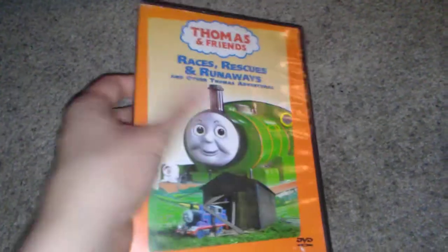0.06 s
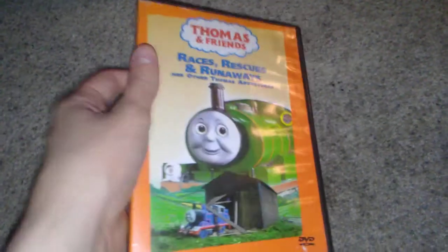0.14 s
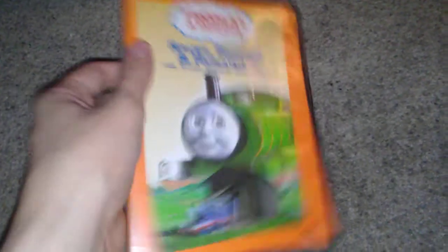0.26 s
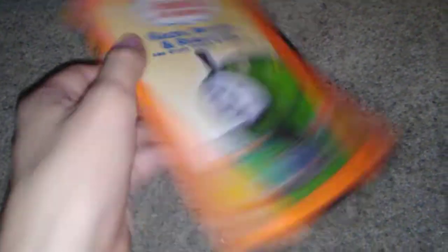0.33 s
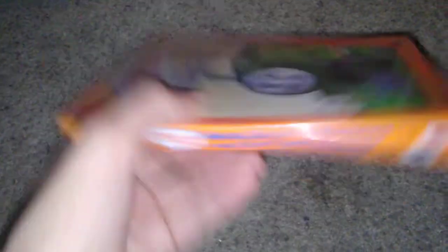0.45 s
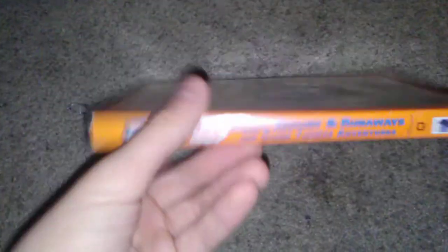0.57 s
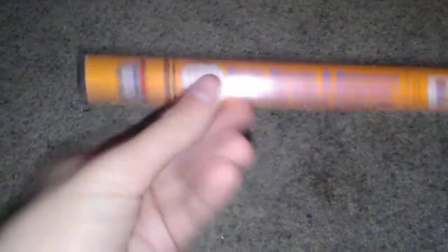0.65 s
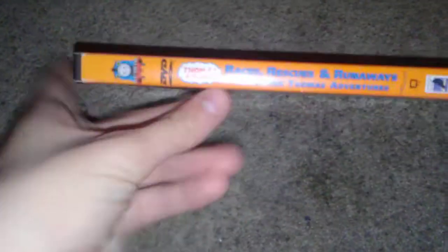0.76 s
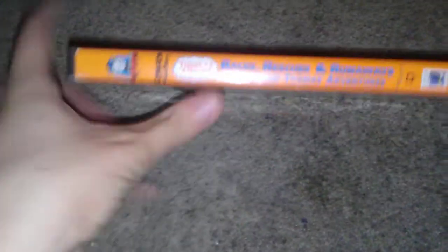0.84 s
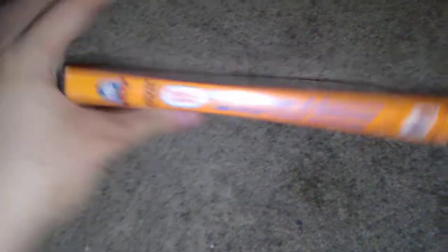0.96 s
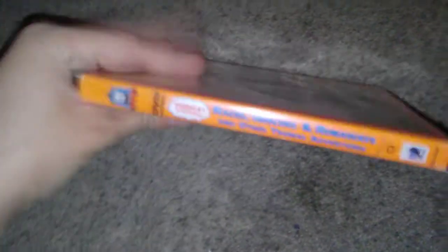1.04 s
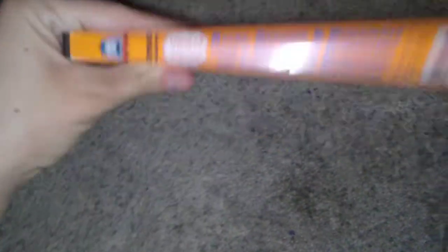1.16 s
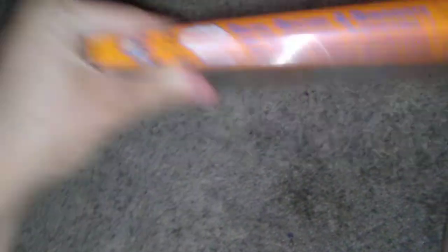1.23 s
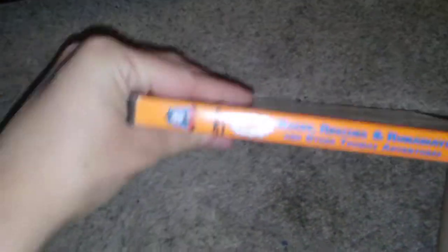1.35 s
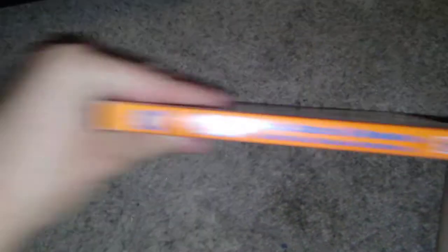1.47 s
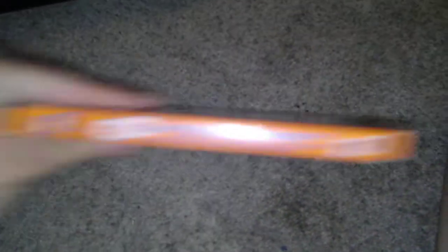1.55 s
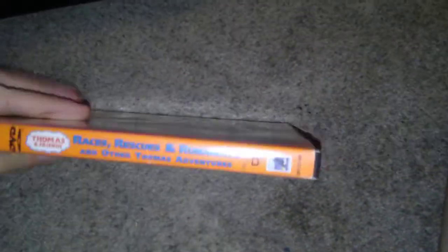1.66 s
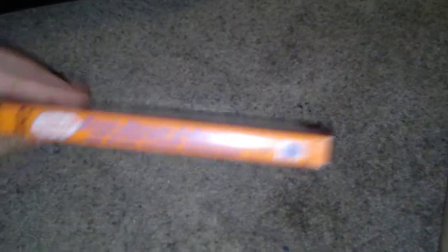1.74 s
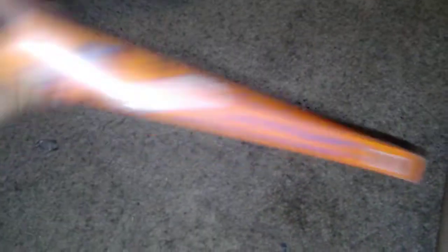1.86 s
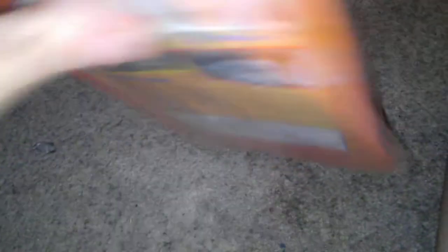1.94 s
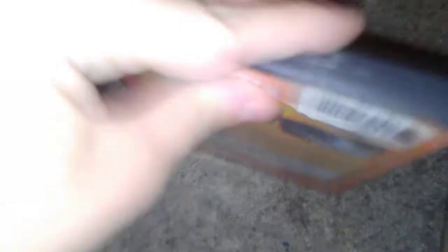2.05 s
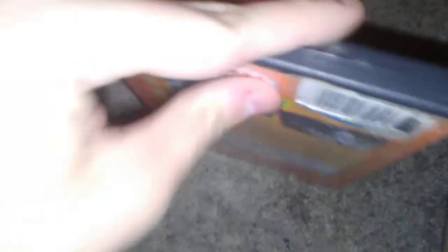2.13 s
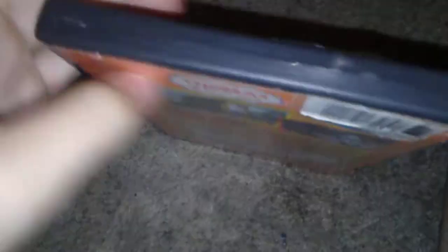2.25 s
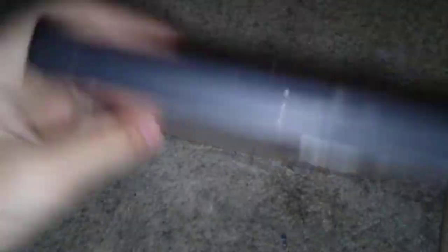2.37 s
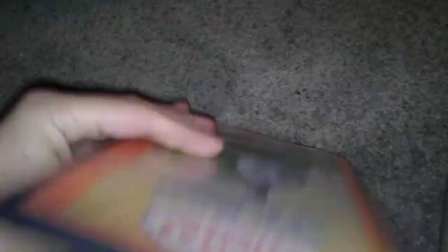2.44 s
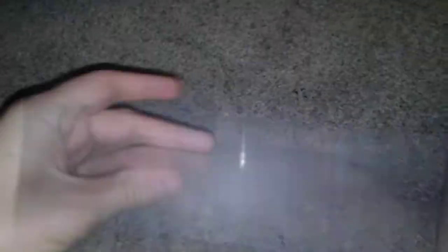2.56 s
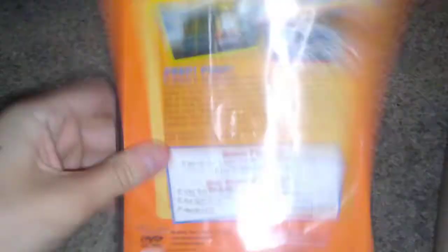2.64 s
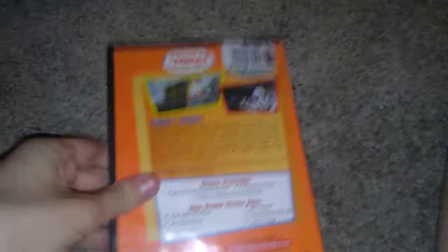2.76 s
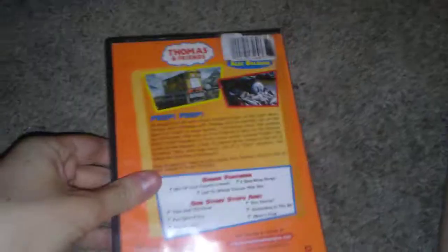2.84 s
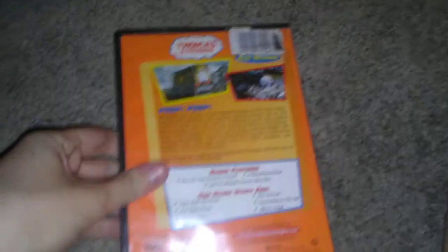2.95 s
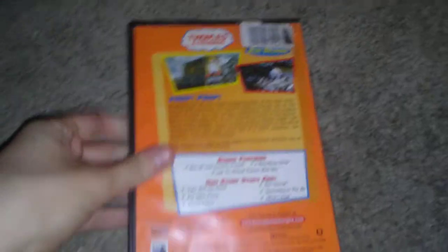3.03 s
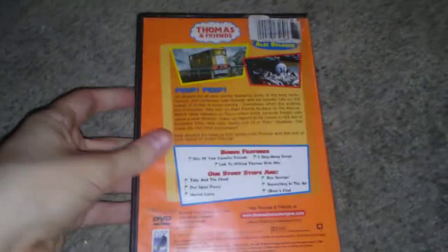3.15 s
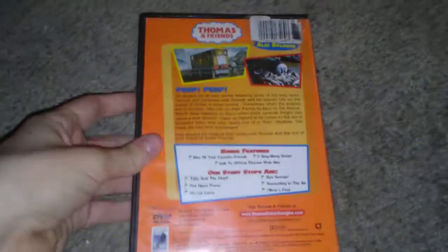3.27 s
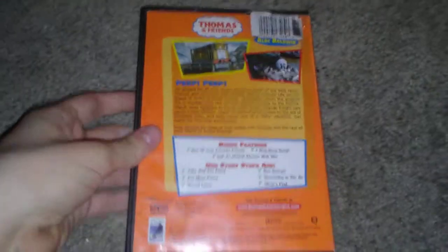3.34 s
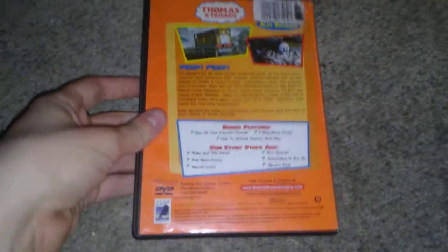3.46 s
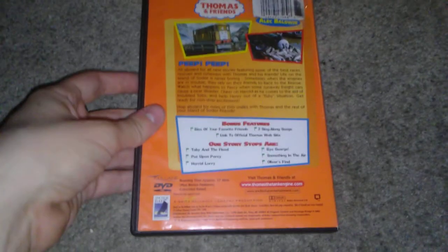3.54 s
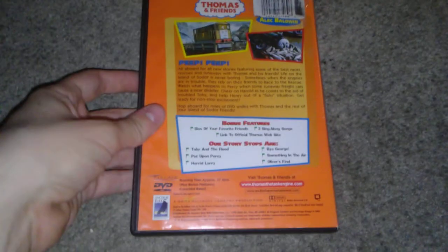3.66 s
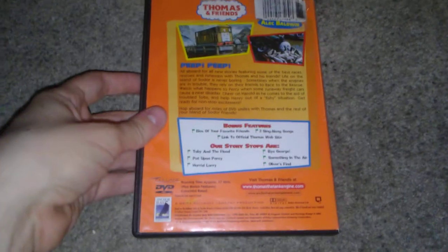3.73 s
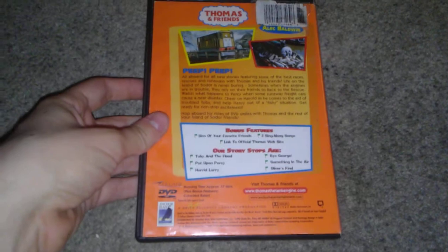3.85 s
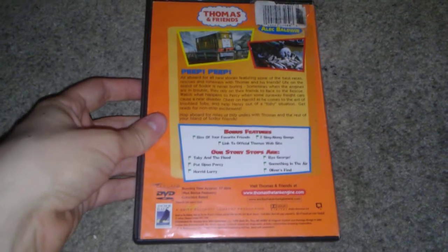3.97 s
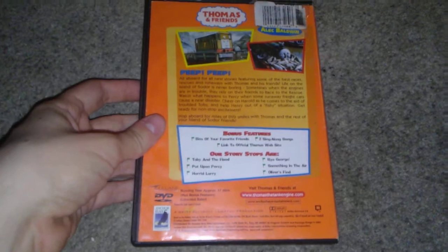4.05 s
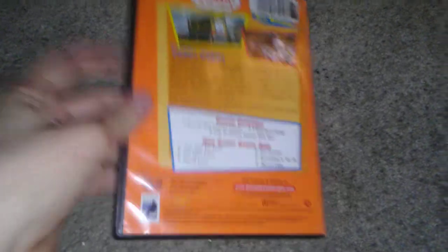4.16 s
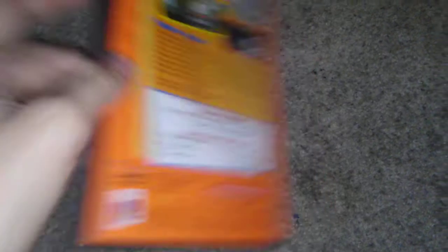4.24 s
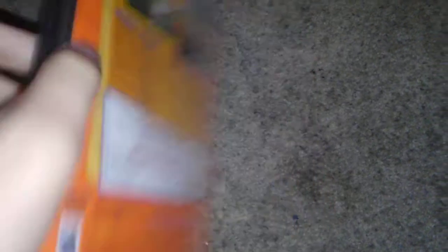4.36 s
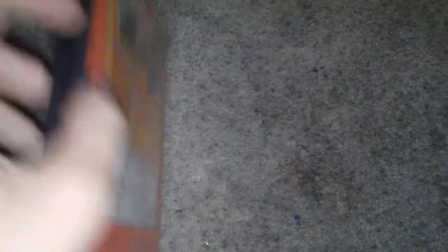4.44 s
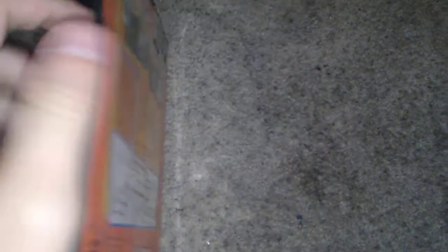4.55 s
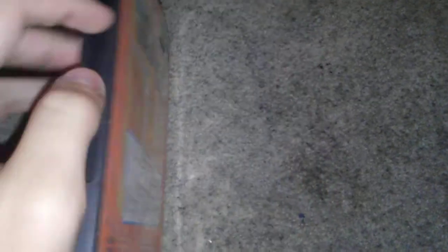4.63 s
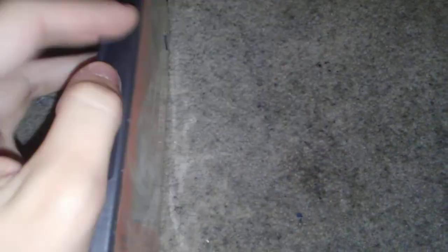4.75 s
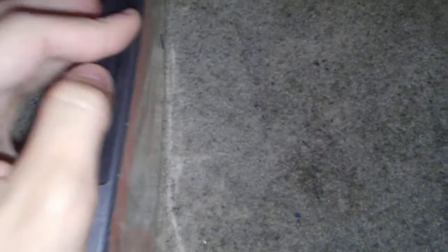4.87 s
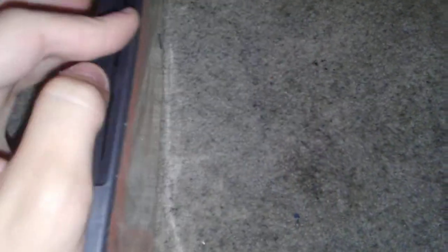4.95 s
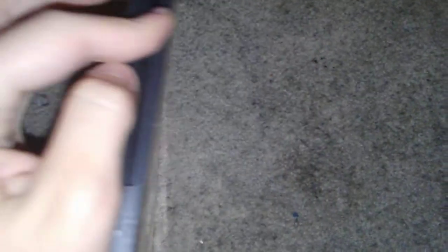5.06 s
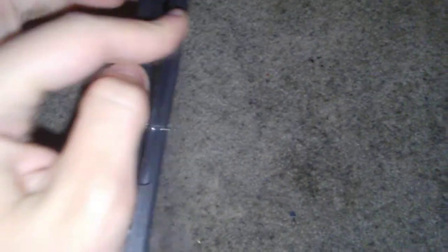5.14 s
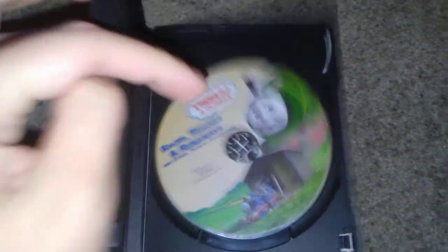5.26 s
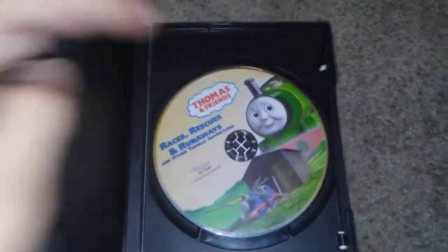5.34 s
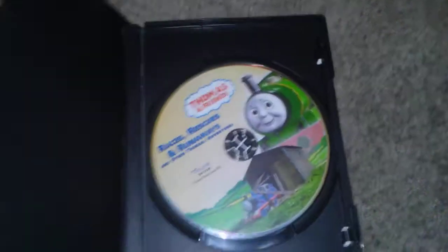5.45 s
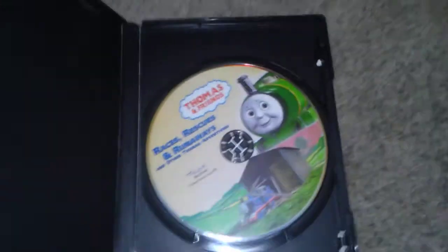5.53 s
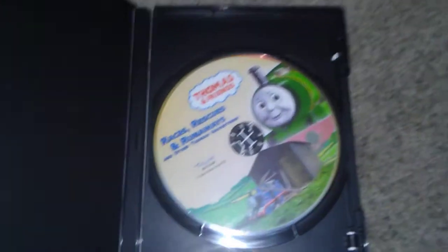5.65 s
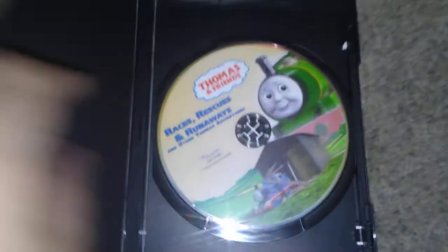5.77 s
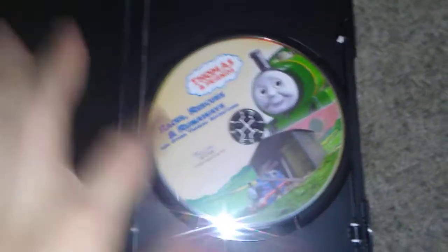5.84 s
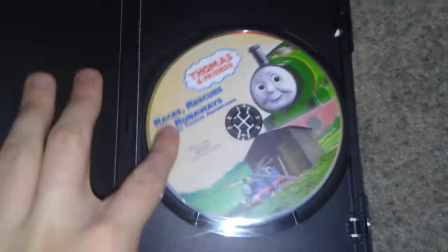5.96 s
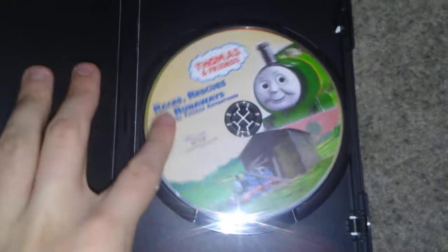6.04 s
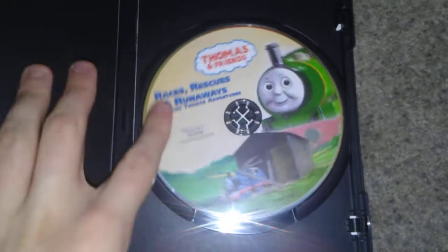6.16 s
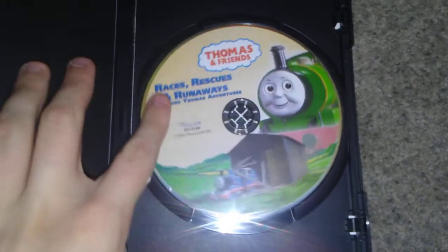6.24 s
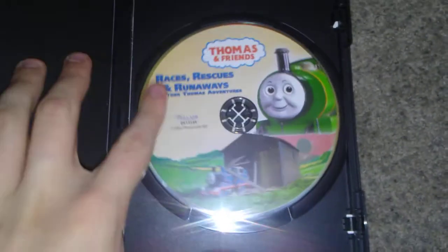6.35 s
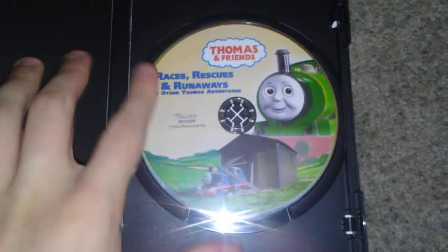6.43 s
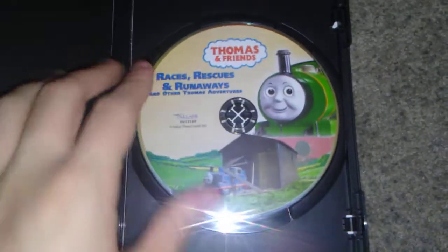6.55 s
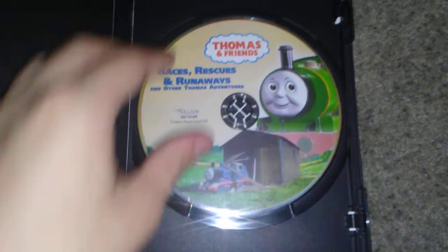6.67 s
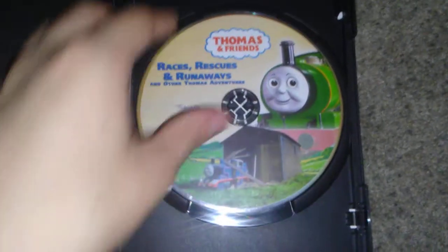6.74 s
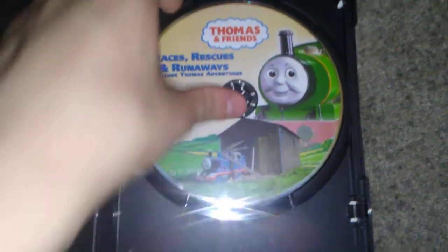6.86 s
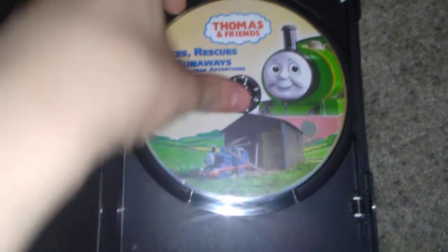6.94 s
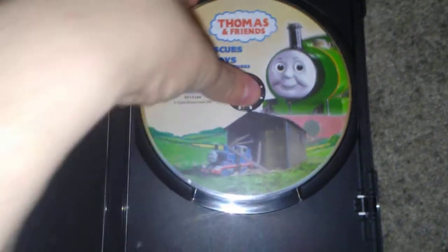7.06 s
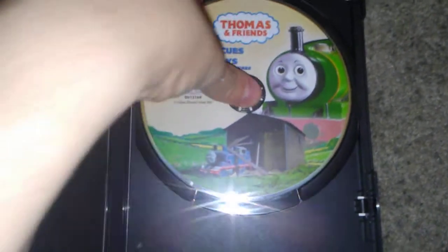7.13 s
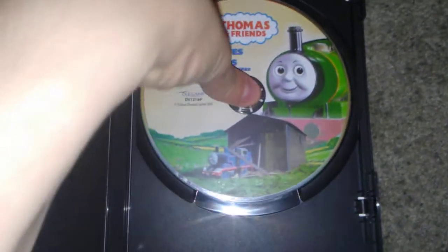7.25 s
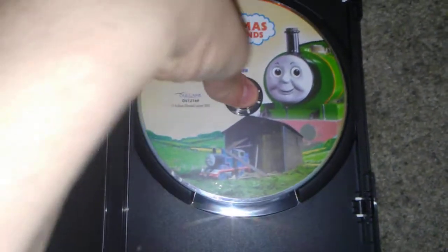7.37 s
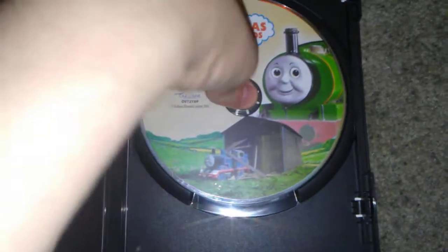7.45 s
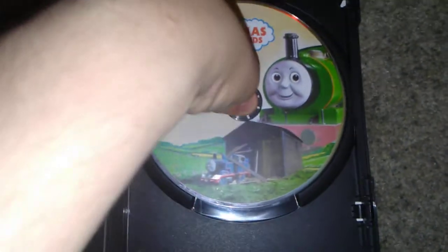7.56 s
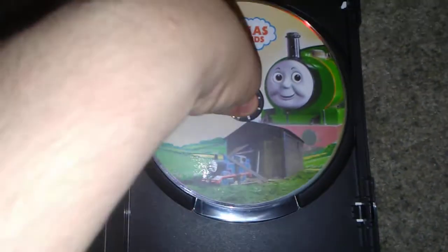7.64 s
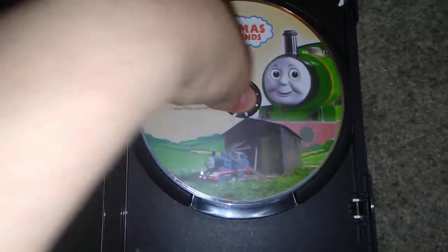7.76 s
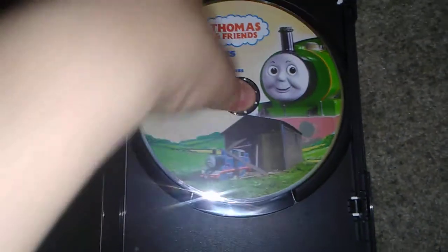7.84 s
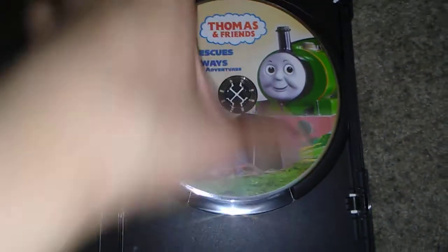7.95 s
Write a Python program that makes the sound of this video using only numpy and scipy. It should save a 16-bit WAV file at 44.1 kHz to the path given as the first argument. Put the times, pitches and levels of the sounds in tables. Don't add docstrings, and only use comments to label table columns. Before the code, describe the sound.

Close to a small microphone in a quiet, slightly reflective room, skin and carpet brush a thin plastic disc case. Light taps begin around 0.25 s, then a dense crunch of brittle snaps at 0.5-0.75 s, with a tiny hinge-like creak just after. Soft scraping sweeps follow near 1.1 and 1.6 s, with a sharp click at 1.38. From 2.0 to 2.7 s the case is turned with ticks, scuffs and grainy rubbing, then clacks loudly at 2.83 s. A smaller click at 3.19 precedes near silence: faint hum, thin whine and hiss. Fumbling ticks and crackles return at 4.2-4.75 s. At 5.21 s comes the loudest burst, hard cracking snaps and ringing thuds until 5.4, then small crackles to 6.0. Faint nail ticks at 6.4-7.5 s lead to a sharp, hollow ringing pop at 7.68 and a few clicks around 7.85-7.95.

```python
import sys
import numpy as np
from scipy import signal
from scipy.fft import rfft, irfft
from scipy.io import wavfile

SR = 44100
rng = np.random.default_rng(int(sys.argv[2]) if len(sys.argv) > 2 else 0)


def undo_db(level):
    steps = np.asarray(level, float) / 20
    return 10 ** steps


def unload_wav(signal):
    wavfile.write(
        sys.argv[1],
        SR,
        np.round(np.clip(np.atleast_2d(signal).T, -1, 1) * 32767).astype(np.int16),
    )


N = 352800


def rms_one(x):
    return x / np.sqrt(np.mean(x ** 2) + 1e-20)


def high_pass(x, hz):
    return signal.sosfilt(signal.butter(4, hz, "high", fs=SR, output="sos"), x)


def shaped(x, points):
    hz, level_db = np.transpose(points)
    grid_hz = np.maximum(np.arange(N // 2 + 1) * SR / N, 1)
    gain = undo_db(np.interp(np.log(grid_hz), np.log(hz), level_db))
    return rms_one(irfft(rfft(x) * gain, N))


def resonate(x, modes):
    out = 0
    for k, (hz, width_hz, level_db) in enumerate(modes):
        r = np.exp(-np.pi * width_hz / SR)
        gain = (-1) ** k * undo_db(level_db) * (1 - r * r) / 2
        poles = [1, -2 * r * np.cos(2 * np.pi * hz / SR), r * r]
        out = out + signal.lfilter([gain, 0, -gain], poles, x)
    return out


def resonate_twice(x, hz, width_hz):
    band = [(hz, width_hz, 0)]
    return resonate(resonate(x, band), band)


def drift(rate_hz):
    r = np.exp(-2 * np.pi * rate_hz / SR)
    walk = signal.lfilter([1], [1, -2 * r, r * r], rng.standard_normal(N + SR))
    return rms_one(walk[SR:])


def add(track, s, sound, level_db, span_s):
    at = int(s * SR)
    gain = undo_db(level_db) * np.sqrt(span_s * SR / np.sum(sound ** 2))
    track[at:at + len(sound)] += gain * sound[:N - at]


def slips(shape, spread_db):
    strength_db = spread_db * np.minimum(rng.exponential(1, shape), 4)
    return undo_db(strength_db) * rng.standard_normal(shape)


def swells(rows, roundness, rest_db, second_rest_db):
    t = np.arange(N // 32 + 1) * 32 / SR
    first, second = np.full(len(t), undo_db(rest_db) ** 2), undo_db(second_rest_db) ** 2
    for s, rise_s, fall_s, level_db, second_db in rows:
        away = np.where(t < s, (s - t) / max(rise_s, .005), (t - s) / max(fall_s, .005))
        power = undo_db(level_db - 20 * away ** roundness) ** 2
        first = first + power
        second = second + power * undo_db(second_db) ** 2
    return [np.interp(np.arange(N) / SR, t, 10 * np.log10(p)) for p in (first, second)]


def scrape_and_hiss(drag):
    hiss = signal.sosfiltfilt(signal.butter(4, 3600, "high", fs=SR, output="sos"), drag)
    return rms_one(drag - hiss), rms_one(hiss)


# (frequency [Hz], density [dB per Hz])
ROOM_HISS = [(25, -5.5), (48, -10), (114, -11.5), (293, -17.5), (1370, -30.5), (9070, -37.5), (14800, -35),
             (16000, -41.5)]
# (frequency [Hz], width [Hz], level [dB])
HUM = [(119, 8, -76), (7150, 90, -88)]


def background():
    out = undo_db(-66.5) * shaped(rng.standard_normal(N), ROOM_HISS)
    for hz, width_hz, level_db in HUM:
        out = out + undo_db(level_db) * rms_one(resonate_twice(rng.standard_normal(N), hz, width_hz))
    return out


# (frequency [Hz], width [Hz], level [dB])
SHELL = [(2025, 200, 4), (2510, 350, 5), (3060, 190, 4.5), (4000, 250, -1.5)]
# (frequency [Hz], width [Hz], level [dB])
EDGE = [(5580, 650, 5), (6550, 350, -6)]


def crackles(scrape_db):
    clicks_per_s = 170 * undo_db(4.0 * drift(12))
    clicks = slips(N, 3.1) * (rng.random(N) < clicks_per_s / SR) + 1e-18
    ringing = high_pass(resonate(clicks, SHELL) + resonate(clicks, EDGE), 1500)
    return undo_db(scrape_db - 11.5) * rms_one(ringing)


# (hardest [s], rise [s], fall [s], panel rustle [dB], rumble [dB re rustle])
SHIFTS = [(.02, .3, .4, -56, 4.5), (.53, 0.025, 0.049, -51, 4), (.61, 0.12, 0.16, -41, -1),
          (.68, 0.074, 0.2, -53, 6), (1.1, 0.085, .12, -50.5, 5.5), (1.39, 0.013, 0.12, -45, 2.5),
          (1.6, 0.39, 0.3, -59.5, 5.5), (1.89, 0.067, 0.098, -65, 10), (2.05, 0.013, 0.056, -43, -11),
          (2.171, 0.085, 0.095, -45.5, 3.5), (2.4, 0.063, 0.29, -53, -2.5),
          (2.664, 0.053, 0.051, -50.5, 8.5), (2.742, 0.021, 0.047, -56.5, 10),
          (2.844, 0.0067, 0.071, -28, 0), (3.15, 0.25, 0.12, -59, 1), (4.536, 0.047, 0.21, -59.5, 4),
          (4.723, 0.067, 0.14, -63.5, 2.5), (5.226, 0.012, 0.11, -29.5, -3), (5.42, 0.035, 0.33, -60.5, 4),
          (6.93, .06, 0.064, -51.5, -5), (7.074, 0.095, 0.16, -58.5, -7), (7.33, 0.11, 0.19, -62, -15),
          (7.693, 0.021, 0.08, -43, 1), (7.866, 0.018, 0.071, -57, 12.5)]
# (hardest [s], rise [s], fall [s], scrape [dB], hiss [dB re scrape])
TURNING = [(.43, 0.13, 0.34, -55, -0.5), (.54, .03, .08, -45, -2.5), (.686, .12, 0.082, -40, -5.5),
           (.8, 0.12, 0.2, -68, 11), (1.384, 0.024, 0.053, -44.5, 3.5), (1.89, 0.72, 0.88, -62, 0.5),
           (2.05, 0.022, .12, -43, -1.5), (2.171, 0.066, 0.08, -42.5, -3), (2.25, .08, .07, -45, 0),
           (2.42, 0.12, 0.18, -39.5, -0.5), (2.54, .1, .06, -49, 0), (2.664, 0.11, 0.038, -38, -5.5),
           (2.742, .05, 0.037, -48, -3), (2.844, 0.021, 0.082, -32, -11.5)]
# (hardest [s], rise [s], fall [s], scrape [dB], hiss [dB re scrape])
OPENING = [(4.443, 0.17, 0.1, -58.5, 3.5), (4.536, .03, 0.17, -55, 1), (4.723, .05, 0.51, -68.5, 3),
           (5.227, .015, 0.11, -34, 0.5), (5.435, .03, .12, -44, -1), (5.56, 0.22, .1, -52.5, -2),
           (5.779, 0.18, 0.25, -72.5, 8), (5.98, 0.067, 0.7, -73.5, -4), (6.93, 0.088, .08, -49.5, -3),
           (7.074, 0.05, 0.092, -57, -6), (7.33, 0.2, 0.2, -69, -13), (7.693, 0.025, 0.12, -53, 6),
           (7.866, 0.037, 0.12, -54, -6)]
# (frequency [Hz], density [dB per Hz])
SLEEVE = [(1250, -31), (1900, -10), (3000, -5.5), (4100, -6.5), (5650, -0.5), (6700, -8.5), (8200, -28),
          (16000, -39)]
# (frequency [Hz], width [Hz], level [dB])
PANEL = [(748, 250, 5), (1050, 290, -0.5), (1566, 580, -1)]
# (frequency [Hz], width [Hz], level [dB])
BODY = [(55.3, 120, -3), (120, 54, 5), (207, 61, 2.5), (356, 140, -1)]


def rubbing():
    scrape_db, hiss_db = swells(TURNING + OPENING, 1.45, -84, -87.5)
    rustle_db, rumble_db = swells(SHIFTS, 1, -85.5, -81.5)
    grip = drift(31)
    drag = undo_db(grip + 1.8 * drift(430)) * shaped(slips(N, 0.84), SLEEVE)
    scrape, hiss = scrape_and_hiss(drag)
    scrape = undo_db(scrape_db + drift(30)) * scrape
    hiss = undo_db(hiss_db + 1.5 * drift(25)) * hiss
    panel = resonate(resonate(slips(N, 1.3), PANEL), [(830, 1200, 0)])
    rustle = undo_db(rustle_db + 2 * grip) * rms_one(panel)
    body = resonate(resonate(slips(N, 1.2), BODY), [(170, 470, 0)])
    rumble = undo_db(rumble_db + 1.6 * drift(45)) * rms_one(body)
    air = undo_db(0.42 * hiss_db - 46) * high_pass(rng.standard_normal(N), 11000)
    return scrape + hiss + crackles(scrape_db) + rustle + rumble + air


# (middle [s], rise [s], fall [s], scrape [dB], hiss [dB re scrape])
SWEEPS = [(.08, 0.17, 0.15, -48, 0.5), (1.11, .09, .11, -42, -3), (1.61, 0.2, 0.13, -38, -2),
          (1.48, .06, .1, -47, -2), (1.03, .035, .1, -51, -3), (3.155, .09, 0.08, -47, -1),
          (3.51, 0.2, 0.09, -61, -3), (4.22, 0.09, 0.13, -60, -6), (6.74, 0.09, 0.2, -66, 12)]


def sweeps():
    scrape_db, hiss_db = swells(SWEEPS, 2, -95, -95)
    drag = undo_db(1.2 * drift(40)) * shaped(slips(N, 1.0), SLEEVE)
    scrape, hiss = scrape_and_hiss(drag)
    air = undo_db(.4 * hiss_db - 55) * high_pass(rng.standard_normal(N), 11000)
    return undo_db(scrape_db) * scrape + undo_db(hiss_db) * hiss + air


# (time [s], shell [dB], ring [Hz], edge crack [dB re shell])
TAPS = [(.2438, -40, 2450, -16), (.3458, -51, 3060, -6.5), (.41, -46, 2938, -2), (.6738, -41, 2870, -2.5),
        (.7755, -56, 3169, -16), (1.8108, -47, 2440, -2.5), (2.0353, -35.5, 2500, -3),
        (2.0418, -37, 2950, -2.5), (2.3745, -37.5, 2660, -1.5), (2.3851, -35, 3320, -2),
        (2.736, -34, 2720, -5), (3.2022, -44.5, 2440, -25), (4.191, -49, 2710, -9),
        (4.5498, -35.5, 3000, -11), (5.4551, -37, 2900, -5.5), (5.4959, -42, 2560, -21),
        (5.538, -43.5, 3000, -22), (5.9755, -37, 2494, -16), (6.9744, -41, 3060, -3.5),
        (7.013, -49, 3120, -1), (7.1324, -49.5, 2516, -13), (7.3465, -49, 2350, -27),
        (7.4461, -44.5, 3500, -7), (7.8983, -40, 3000, -.6), (5.731, -52, 1050, -10)]
# (time [s], shell [dB], ring [Hz], edge crack [dB re shell])
KNOCKS = [(.2515, -40.5, 2370, -7.5), (.419, -47, 2200, 2), (.6177, -29.5, 3420, -4),
          (.6492, -30, 2730, -2.5), (.656, -36.5, 3314, 4), (.7223, -47, 2600, -3), (.7375, -48, 3130, -4),
          (1.0766, -39, 3450, -0.5), (1.0985, -38, 2525, 0.5), (1.1323, -40, 2640, 5),
          (1.1548, -43, 2670, -18), (2.0634, -41, 4330, -9), (2.1598, -36, 3300, -19),
          (2.8931, -47, 2630, 8.5), (2.9212, -51, 3300, 7), (3.0, -55, 2620, 8), (3.033, -67, 2564, 20),
          (4.5307, -37, 2714, -1), (4.599, -45, 3580, 4.7), (4.7518, -61, 2820, 13.5),
          (5.3714, -36.5, 2450, -3), (5.393, -38, 2400, -10.5), (5.413, -34, 2400, 4),
          (5.629, -58, 1610, -9), (5.6714, -55, 3060, -6), (7.698, -31, 2168, -6),
          (7.863, -37.5, 1910, -15), (7.951, -44.5, 2670, 4.5), (.529, -33, 2650, 0)]
# (time [s], shell [dB], ring [Hz], edge crack [dB re shell])
DRY_TICKS = [(.5139, -34, 2580, -6), (2.9469, -47, 2680, 7), (4.1709, -51, 2360, -8.5),
             (4.375, -52.5, 2790, -1), (4.4032, -60, 4640, 16), (7.518, -62, 3350, 3.5),
             (6.4116, -52, 2330, -16), (6.4537, -58, 2944, -21), (6.4971, -51, 2900, -6.5),
             (6.5241, -48, 3100, -2.5), (6.5417, -57.5, 2990, 2), (6.5708, -53, 2720, -6.5),
             (6.8776, -46, 3140, -3.5), (6.9166, -43.5, 3050, -1.5), (6.9408, -36.5, 2390, -17.5),
             (7.838, -42.5, 3920, -4.5), (7.8482, -31.5, 4040, -3), (7.9313, -57, 2440, 2),
             (4.853, -66.5, 3000, 17)]
# (time [s], shell [dB], ring [Hz], edge crack [dB re shell], thud [dB re shell])
CRUNCHES = [(0.575, -29.5, 2700, -3, -8), (0.5868, -20.5, 2470, -12.5, -3), (0.6906, -39.5, 3178, 6, 14),
            (4.5896, -37, 3320, -7, -4), (4.704, -45.5, 3400, 7.5, -18.5), (4.7155, -34, 3280, -0.5, -10.5),
            (5.5743, -44, 2430, -11, -13), (5.9645, -42, 2940, -10, -15)]
# (time [s], shell [dB], ring [Hz], edge crack [dB re shell], thud [dB re shell])
SNAPS = [(0.5941, -26.5, 2580, 4, 6), (.6113, -31, 3410, -1, -7), (0.6833, -29.5, 2670, -5, -3),
         (1.371, -32, 3440, -1, 4), (1.382, -28, 2800, -4, -3), (2.1862, -31.5, 2140, -4, -3.5),
         (2.8228, -13, 2300, -6, -2.5), (2.8277, -10.5, 2600, -12, -8), (2.8345, -21, 2006, -4, -15.5),
         (2.8478, -15, 2100, -4, -7), (2.863, -28, 3402, 4, 3.5), (2.8842, -33, 3300, 3, -1),
         (3.185, -40, 3920, -4, -25), (5.2105, -7, 3100, -12, -11), (5.2182, -6, 2848, -4, -8.5),
         (5.2318, -15, 2900, 1, -6), (5.2525, -23, 3180, -12, -20.5), (5.2632, -29.5, 3320, -22.5, -21),
         (5.273, -16, 3008, -1.5, -12), (5.2978, -22.5, 2600, -3, -31.5), (5.3398, -18.5, 2262, -6, -4.5),
         (5.3565, -21, 3100, -14.5, -32), (7.679, -16, 2080, -3, 3), (7.6862, -25, 2200, -12, 2)]


def contacts():
    snap_ms, crunch_ms, tick_ms = 1.04, 3.6, 1.2
    rows = [(*row, snap_ms) for row in SNAPS] + [(*row, crunch_ms) for row in CRUNCHES]
    for table, thud_db in ((DRY_TICKS, -20.5), (TAPS, -6.5), (KNOCKS, 1.35)):
        rows = rows + [(*row, thud_db, tick_ms) for row in table]
    return [(*row[:-1], row[-1] * (SHELL[2][0] / row[2]) ** 1.3) for row in rows]


def ticks():
    out, t = np.zeros(N), np.arange(2048) / SR
    span_s = .0063
    rows = contacts()
    grits = slips((len(rows), len(t)), 3.4)
    for (s, shell_db, hz, edge_db, thud_db, crackle_ms), grit in zip(rows, grits):
        crackle_ms = max(crackle_ms, .2)
        burst = grit * (1 - np.exp(-800 * t / crackle_ms)) * np.exp(-600 * t / crackle_ms)
        own_ring = rms_one(resonate(resonate(burst, [(hz, 600, 0)]), [(hz, 900, 0)]))
        all_modes = rms_one(resonate(burst, SHELL) + 0.62 * resonate(burst, [(3000, 1000, 0)]))
        shell = undo_db(0.43 * shell_db) * 2 * all_modes + own_ring
        add(out, s, high_pass(shell, min(0.93 * hz, 1900)), shell_db, span_s)
        edge = resonate(burst, EDGE) + 0.36 * undo_db(0.3 * shell_db) * burst
        add(out, s, high_pass(edge, 4900), shell_db + edge_db, span_s)
        panel = resonate(resonate(burst, PANEL), [(970, 830, 0)])
        add(out, s, panel, shell_db + thud_db - 6.5, span_s)
        push = np.sign(grit[0]) * t * np.exp(-t / 0.00023) * (2 + grit)
        add(out, s, resonate(push, BODY), shell_db + thud_db - 7.5, span_s)
    return out


# (time [s], level [dB], centre [Hz], width [Hz], length [ms])
CRACKS = [(.366, -54, 3300, 2500, 8), (.714, -48, 5600, 1500, 3), (.7965, -49, 5700, 1200, 3),
          (1.3797, -11.5, 3050, 900, 1.6), (1.3797, -17, 2300, 700, 1.6), (1.868, -54, 500, 900, 5),
          (1.899, -53, 2500, 5000, 3), (3.1843, -24.5, 3200, 1500, 1.6), (5.21, -13, 6800, 2200, 2),
          (5.2522, -19, 3200, 800, 2.5), (5.265, -28, 3100, 600, 3), (5.334, -28, 5750, 400, 13),
          (5.335, -30, 2600, 1500, 6), (6.474, -60, 2700, 1200, 6), (6.958, -50, 2700, 1500, 5),
          (6.99, -48, 2700, 1800, 6), (6.992, -53, 5600, 900, 5), (7.676, -25, 2300, 1600, 4),
          (7.678, -10.5, 1900, 1700, 4), (7.694, -28, 3100, 1300, 5), (7.809, -60, 3700, 1200, 6),
          (7.877, -43, 2800, 1800, 5), (7.927, -46, 2400, 600, 6), (7.945, -52, 5800, 1200, 4),
          (2.889, -34, 5800, 1500, 2), (2.8935, -34, 6000, 2000, 2), (3.027, -54, 5800, 1500, 3),
          (3.6, -64, 6000, 3000, 3), (1.082, -39, 3800, 5000, 8), (4.219, -55, 5500, 2000, 3),
          (4.364, -56, 2500, 1500, 3), (4.63, -51, 5500, 4000, 3), (5.629, -53, 4000, 6000, 2),
          (5.719, -57, 2900, 900, 4), (5.958, -49, 2900, 900, 4), (5.959, -58, 5500, 500, 3),
          (7.044, -52, 2600, 1500, 6), (7.152, -54, 2450, 600, 5)]


def blunt_cracks():
    out, t = np.zeros(N), np.arange(1024) / SR
    grits = slips((len(CRACKS), len(t)), 1.5)
    for (s, level_db, hz, width_hz, length_ms), grit in zip(CRACKS, grits):
        phase = np.clip(1000 * t / max(length_ms, .5), 0, 1)
        burst = grit * np.sin(np.pi * phase ** .8)
        crack = resonate_twice(burst, hz, max(width_hz, 100)) + .026 * burst
        add(out, s, crack, level_db, .0063)
    return out


# (time [s], frequency [Hz], level [dB])
PANEL_RINGS = [(.607, 800, -36), (2.05, 1000, -46), (2.068, 1000, -44), (2.187, 2000, -42),
               (2.866, 750, -29), (2.865, 2650, -31), (2.887, 750, -37), (2.85, 260, -24),
               (1.102, 250, -36), (2.153, 350, -38), (7.861, 260, -40), (7.952, 260, -45), (7.69, 190, -29),
               (6.906, 850, -55), (6.935, 800, -53), (1.082, 800, -44), (.534, 2700, -41),
               (5.985, 350, -50)]
# (time [s], frequency [Hz], level [dB])
RINGS = [(1.3825, 4110, -23), (2.851, 4126, -19.5), (5.301, 4170, -25), (5.219, 335, -23),
         (2.825, 330, -22), (7.679, 620, -23), (1.371, 230, -24), (7.681, 3970, -14), (7.6858, 3990, -16),
         (7.702, 4000, -31), (2.662, 314.8, -30), (5.34, 208, -21), (5.974, 395, -42), (7.6782, 900, -15.5),
         (7.868, 850, -41), (7.899, 6000, -43), (7.906, 2520, -43), (5.344, 2700, -25), (5.359, 3100, -24),
         (3.1865, 4050, -33), (5.2995, 2400, -29), (7.447, 4000, -50), (7.852, 4000, -36),
         (7.933, 2365, -35), (7.952, 2450, -34), (5.223, 57.67, -22)]


def rings():
    out, t = np.zeros(N), np.arange(2048) / SR
    for s, hz, level_db in RINGS:
        decay_s = 0.0014 + 0.27 / hz
        add(out, s, np.sin(2 * np.pi * hz * t) * t * np.exp(-t / decay_s), level_db, .006)
    for s, hz, level_db in PANEL_RINGS:
        add(out, s, np.sin(2 * np.pi * hz * t) * t * np.exp(-t / .0036), level_db, .012)
    return out


# (hardest [s], rise [s], fall [s], shell [dB], edge [dB re shell])
MURMURS = [(.66, .12, .18, -52, 8), (2.2, .1, .15, -50, -6), (2.42, .1, .25, -48, -4),
           (5.52, .15, .15, -56, -2), (6.7, .06, .15, -66, 6), (6.93, .09, .1, -49, -5),
           (7.07, .04, .1, -53, -5), (7.14, .04, .04, -60, -10), (7.27, .1, .12, -69, -8),
           (3.08, .1, .1, -58, -8), (3.36, .07, .1, -66, -10), (4.16, .04, .12, -60, -8),
           (4.42, .08, .12, -60, -1), (4.64, .02, .03, -66, 10), (5.99, .03, .03, -53, -8),
           (5.69, .02, .05, -64, -3), (7.47, .04, .12, -66, -3)]
# (frequency [Hz], width [Hz], level [dB])
MURMUR_LOW = [(2430, 150, 0), (3000, 220, -3)]
# (frequency [Hz], width [Hz], level [dB])
MURMUR_EDGE = [(5600, 350, 0), (6300, 400, -8)]


def murmurs():
    low_db, edge_db = swells(MURMURS, 1.45, -95, -95)
    drag = undo_db(2.5 * drift(60)) * slips(N, 1.5)
    out = 0
    for modes, level_db in ((MURMUR_LOW, low_db), (MURMUR_EDGE, edge_db)):
        murmur = resonate(resonate(drag, modes), [(modes[0][0], 1500, 0)])
        out = out + undo_db(level_db) * rms_one(murmur)
    return out


# (time [s], level [dB], frequency [Hz])
NICKS = [(.7357, -36, 5800), (.7357, -45, 3000), (.703, -41, 5900), (.656, -38, 5900), (.69, -40, 5900),
         (1.3805, -31, 5600), (1.3875, -36, 5900), (1.422, -46, 6000), (2.8238, -19, 5200),
         (2.8282, -20, 5300), (2.8495, -22, 6400), (3.185, -31, 5000), (3.1848, -36, 7400),
         (5.2108, -12, 5800), (5.298, -28, 5400), (5.63, -53, 1000), (5.2205, -12, 4500),
         (7.687, -28, 5800), (7.697, -42, 6700)]


def nicks():
    out, click = np.zeros(N), 1. * (np.arange(512) == 0)
    for s, level_db, hz in NICKS:
        add(out, s, resonate_twice(click, hz, 900), level_db, .0063)
    return out


# (start [s], end [s], rate [slips per s], level [dB])
CREAK = (.7492, .792, 154, -44)


def creak():
    start, end, rate, level_db = CREAK
    times = np.arange(start, end, .5 / rate)
    rebound = np.arange(len(times)) % 2
    strength_db = -7 * rebound - 140 * (times - start) + 1.5 * rng.standard_normal(len(times))
    pulses = np.zeros(4096)
    pulses[((times - start - .0006 * rebound) * SR).astype(int)] = undo_db(strength_db)
    edge = resonate(resonate(pulses, [(5750, 800, 8)]), [(5750, 1200, 0)])
    shell = resonate(resonate(pulses, [(3050, 600, 0)]), [(3050, 900, 0)])
    panel = resonate(resonate(pulses, [(1650, 70, 15)]), [(1650, 500, 0)])
    out = np.zeros(N)
    add(out, start, edge + shell + panel, level_db, end - start)
    return out


# (time [s], length [s], level [dB], thud [dB re scuff])
SCUFFS = [(1.356, .045, -40.5, -1.5), (2.023, .017, -44.5, -1.5), (2.133, .02, -33.5, -5),
          (2.654, .037, -40, -4.5), (4.246, .026, -49.5, -15), (4.43, .022, -43, -30),
          (4.516, .021, -38.5, -.5), (5.73, .017, -45, -20), (7.307, .022, -58.5, -8)]


def scuffs():
    out, t = np.zeros(N), np.arange(4096) / SR
    grits = slips((len(SCUFFS), len(t)), 1.2)
    for (s, length_s, level_db, thud_db), grit in zip(SCUFFS, grits):
        phase = np.clip(t / max(length_s, .002), 0, 1)
        skid = grit * np.sin(np.pi * phase ** .7) ** 0.2
        add(out, s, resonate(skid, SHELL) + resonate(skid, EDGE), level_db, length_s)
        thud = resonate(skid, BODY) + 0.14 * resonate(skid, PANEL)
        add(out, s, thud, level_db + thud_db, length_s)
    return out


def room(x):
    t = np.arange(SR // 2) / SR
    tail = rng.standard_normal(len(t)) * undo_db(-60 * t / 0.15) * (1 - np.exp(-t / .004))
    tail = signal.sosfilt(signal.butter(1, 5000, fs=SR, output="sos"), tail)
    return undo_db(-22) * signal.fftconvolve(x, tail / np.sqrt(np.sum(tail ** 2)))[:N]


def scene():
    cracks = ticks() + scuffs() + creak() + blunt_cracks() + nicks()
    knocks = cracks + room(cracks) + rings()
    knocks = 0.94 * np.tanh(knocks / 0.95)
    leak = undo_db(-26) * high_pass(np.tanh(cracks), 8200)
    knocks = signal.sosfilt(signal.butter(8, 7300, fs=SR, output="sos"), knocks) + leak
    return (knocks + rubbing() + sweeps() + murmurs() + background())[None]


def band_limit(x):
    return signal.sosfilt(signal.butter(12, 15900, fs=SR, output="sos"), x)


def record(dry):
    mix = np.clip(high_pass(dry, 55), -1, 1)
    return band_limit(mix)


dry = scene()
out = record(dry)
unload_wav(out)
```